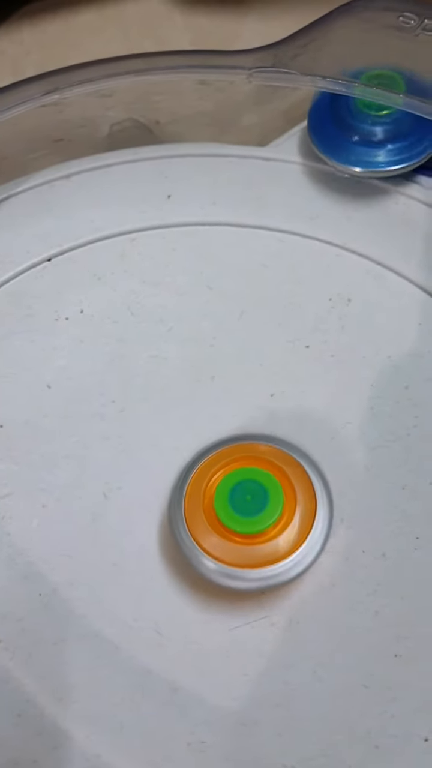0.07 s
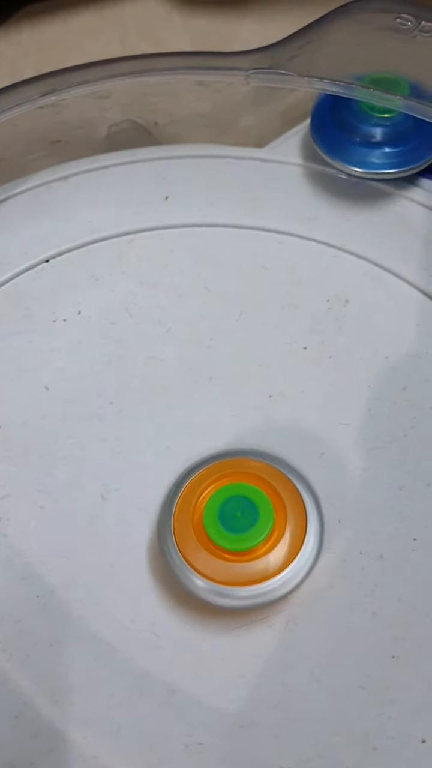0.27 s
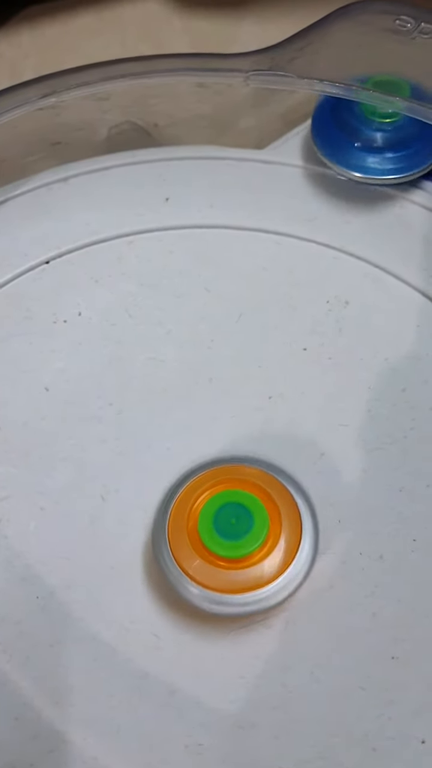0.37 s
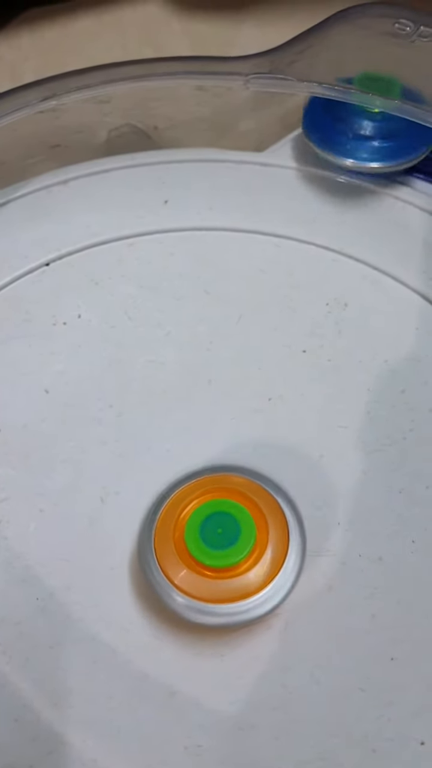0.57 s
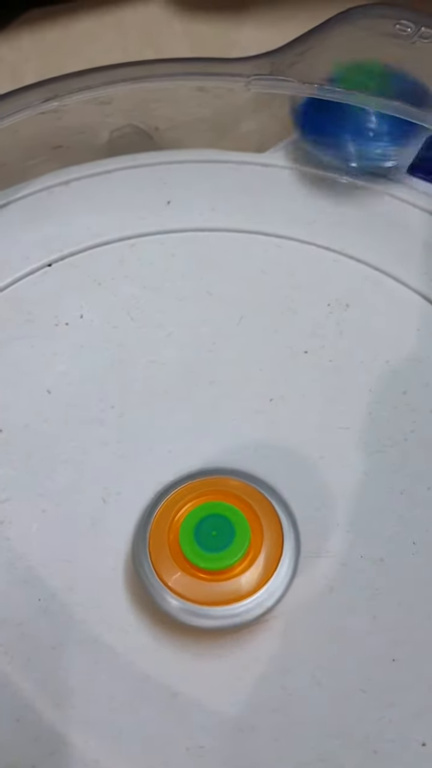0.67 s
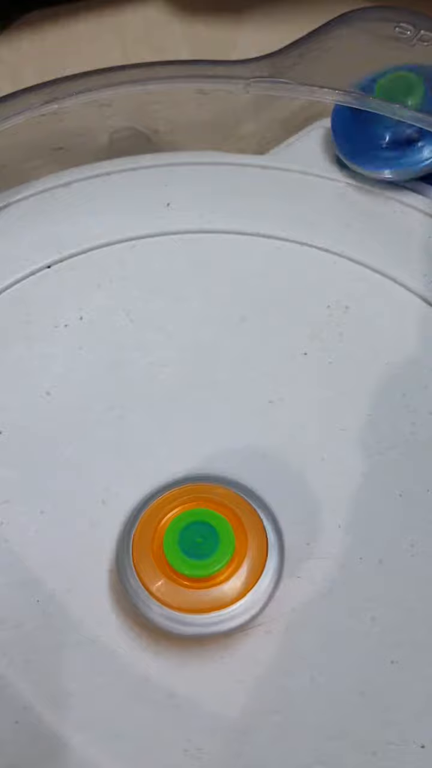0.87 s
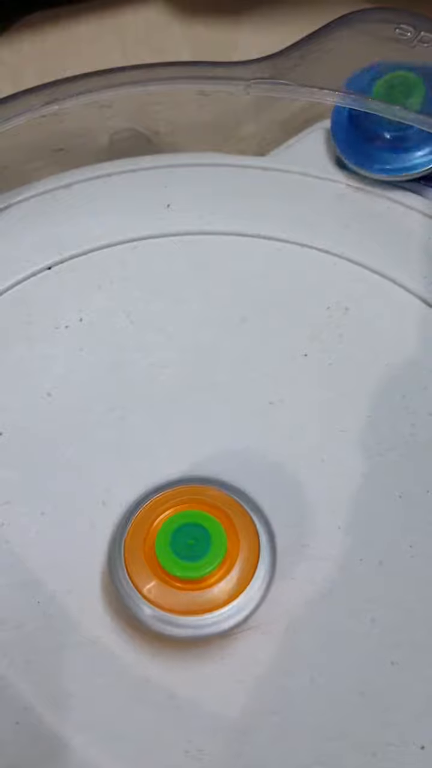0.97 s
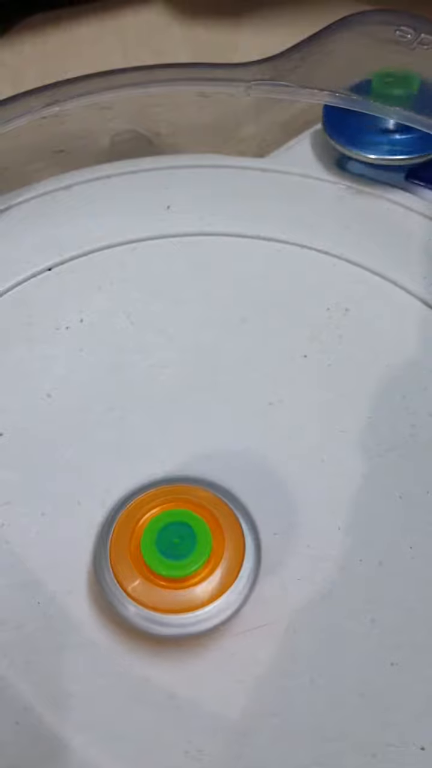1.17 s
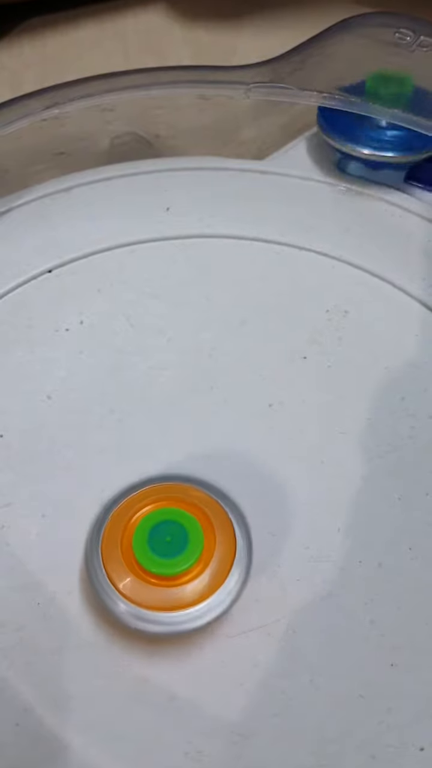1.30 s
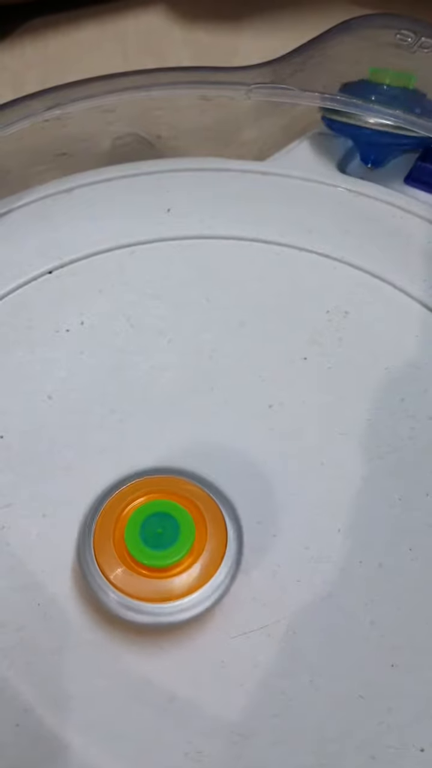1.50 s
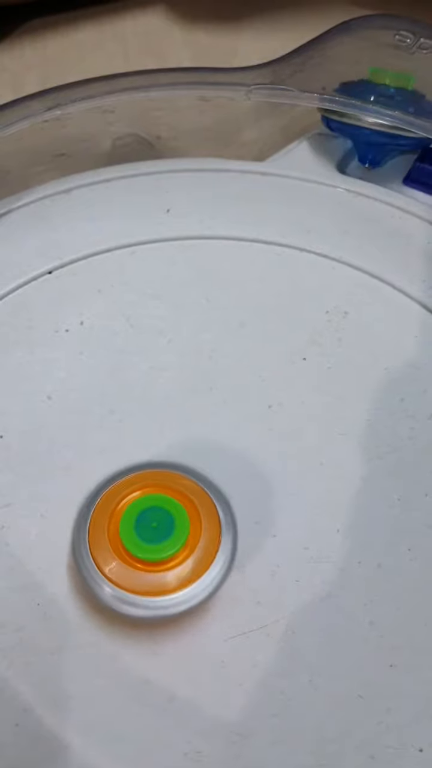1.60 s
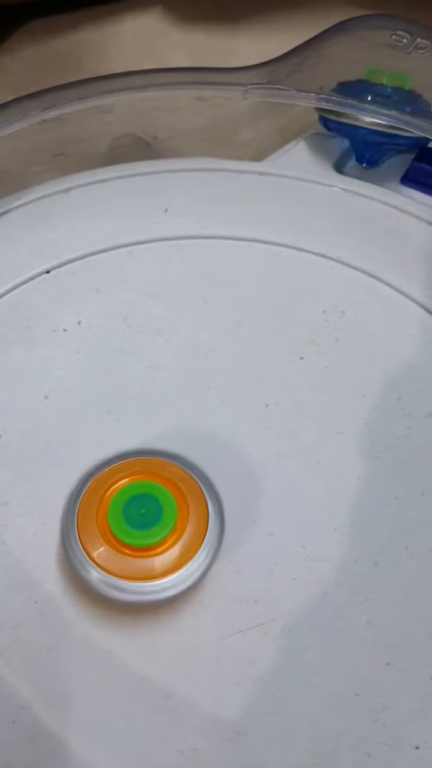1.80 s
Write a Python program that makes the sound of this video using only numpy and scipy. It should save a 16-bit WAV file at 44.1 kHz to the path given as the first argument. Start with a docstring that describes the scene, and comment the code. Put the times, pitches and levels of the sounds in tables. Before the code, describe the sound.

Hollow plastic clatter of a spinning top hitting an arena's rim, with faint humming underneath.

```python
"""In a small room, two plastic tops spin close by in a moulded plastic arena.
One skids into a pocket at the rim, where it knocks, rattles and scrapes against the thin walls
and makes them ring. Its metal ring pings on the rim, and its heavy landings boom in the floor.
Underneath, the off-balance spin hums through the arena floor, a tip grinds and ticks twice a turn,
and there is a low rumble."""
import sys
import numpy as np
from scipy import signal
from scipy.fft import rfft, irfft, next_fast_len
from scipy.io import wavfile
from scipy.ndimage import map_coordinates

SR = 44100
rng = np.random.default_rng(int(sys.argv[2]) if len(sys.argv) > 2 else 0)


def output_pcm(signal):
    """Save a mono or channel-first signal as 16-bit PCM at the path in sys.argv[1].

    Samples are clipped to [-1, 1] before scaling.
    """
    pcm = np.clip(np.atleast_2d(signal).T, -1, 1) * 32767
    wavfile.write(sys.argv[1], SR, np.round(pcm).astype(np.int16))


N = 81585

# The notes the arena's plastic shell rings with. Each row: pitch in Hz, level in dB.
SHELL_NOTES = [(555, -0.5), (612, -27), (655, 3), (882, 1), (974, 2), (1040, -1.5), (1264, 0.5)]
SHELL_CYCLES = 63.5  # swings until a note has died away


def wall_knocks():
    """Each knock shoves the wall, which rings with the hollow pocket; the top itself clacks and snaps."""
    # Each row: start in seconds, wall thud in dB, top's clack in dB, contact snap in dB, wall pitch in Hz.
    hits = [(.247, -12, -19.5, -31, 598), (.259, -18.5, -45, -31.5, 645), (0.306, -13.5, -25, -39.5, 563),
            (.311, -21, -24, -31, 556), (0.4216, -25, -23, -38, 565), (0.443, -18, -26.5, -31.5, 620),
            (.451, -17.5, -34, -48, 683), (.4755, -14.5, -23.5, -30, 540), (.479, -11.5, -14, -18, 633),
            (.537, -9, -16.5, -22.5, 588), (0.546, -13.5, -13.5, -20, 528), (.6035, -12, -14.5, -20.5, 499),
            (.622, -15, -24, -30, 493), (0.6652, -19, -42, -32.5, 625), (.692, -14.5, -47, -33.5, 564),
            (0.7059, -14.5, -18, -27, 598), (0.7195, -10.5, -15.5, -15.5, 651),
            (.731, -11, -20.5, -39, 480), (.768, -28, -21, -31, 666), (0.8018, -9, -21, -24, 630),
            (.83, -29, -11, -27, 910), (.855, -11, -15, -23, 1020), (.889, -16, -20.5, -26.5, 580),
            (.92, -35, -11, -25, 476), (.933, -22, -16, -26.5, 466), (.9717, -22, -19, -27, 673),
            (.9955, -10, -24, -31.5, 706), (1.0095, -14.5, -15, -31, 516), (1.0518, -5, -17, -26, 1108),
            (1.062, -17.5, -20.5, -26, 575), (1.094, -11.5, -21.5, -28, 586),
            (1.135, -15.5, -18, -30.5, 655), (1.225, -31.5, -36.5, -36, 540),
            (1.2723, -29, -32, -41.5, 1060), (1.3171, -16.5, -18, -30, 658), (1.35, -19.5, -29, -35, 595),
            (1.3607, -23.5, -34, -38, 493), (1.4109, -34, -23.5, -28, 540), (1.44, -13.5, -19, -28, 573),
            (1.457, -16, -19.5, -44, 480), (1.4645, -6, -36, -42, 662), (1.4967, -10.5, -24.5, -26, 460),
            (1.55, -23, -25, -50, 590)]
    # The tone of the top's body clacking. Each row: frequency in Hz, level in dB.
    clack_tone = [(300, -51), (500, -3.5), (1000, 8.5), (1700, 3.5), (2400, -7), (3000, -3.5),
                  (5000, -35.5)]
    # The tone of the hard contact snapping. Each row: frequency in Hz, level in dB.
    snap_tone = [(1200, -6), (3000, 3), (5200, 1), (6700, -7), (7800, -0.5), (10000, -6.5), (12500, -7),
                 (16000, -12.5)]
    pocket_hz, pocket_width_hz, hard_snap_db = 466.3, 67, -14
    out, t = np.zeros((2, N + SR)), np.arange(SR // 5) / SR
    for start, thud_db, clack_db, snap_db, wall_hz in hits:
        thud = amp(2) * np.cos(2 * np.pi * wall_hz * t) * fade(t, 31.8 / wall_hz)
        # The pocket rings most when the wall's pitch is near its own.
        pocket_gain = amp(-4) / np.hypot(1, (wall_hz - pocket_hz) / pocket_width_hz)
        pocket = pocket_gain * np.cos(2 * np.pi * pocket_hz * t) * fade(t, 0.11)
        shell = amp(-9.5) * ring(t, SHELL_NOTES, SHELL_CYCLES)
        # The wall gives off little sound below its lowest note.
        ringing = high_pass(thud + pocket + shell, hz=389, order=4)
        wall = amp(thud_db) * (amp(1) * shove(t, hz=733) + ringing)
        clack = amp(3.5 + clack_db) * noise(len(t), clack_tone) * fade(t, 0.053)
        tilt_db_per_octave = 0.14 * (snap_db - hard_snap_db)  # softer snaps are duller
        dulled = [(hz, db + tilt_db_per_octave * np.log2(hz / snap_tone[0][0])) for hz, db in snap_tone]
        snap = amp(4 + snap_db) * noise(len(t), dulled) * fade(t, 0.04, rise_s=0.00049)
        add(out, start, wall + clack + snap)
    return out[:, :N]


def metal_pings():
    """The top's metal ring strikes the rim and sounds a few high notes."""
    # Each row: start in seconds, level in dB.
    strikes = [(.4785, -10.5), (.546, -34), (.604, -17), (.72, -45)]
    # The metal's notes. Each row: pitch in Hz, level in dB.
    metal_notes = [(4670, -3), (4950, 2), (5250, -5), (7600, -6), (9550, -10)]
    out, t = np.zeros((2, N + SR)), np.arange(SR // 5) / SR
    for start, db in strikes:
        add(out, start, amp(db) * ring(t, metal_notes, cycles=82, apart_hz=9000))
    return out[:, :N]


def floor_landings():
    """The top lands heavily: the arena floor makes one slow swing and booms."""
    # Each row: start in seconds, level in dB.
    landings = [(.248, -16), (0.311, -17), (.33, -26), (0.448, -17), (.72, -16.5), (.802, -26.5),
                (0.86, -24), (.921, -14), (0.97, -19.5), (0.998, -18.5), (1.053, -21.5), (1.137, -24.5),
                (1.412, -28.5), (1.498, -21.5)]
    # The floor's low notes. Each row: pitch in Hz, level in dB.
    floor_notes = [(108, -9.5), (152, -8), (212, -2.5), (255, 0), (296, -7.5)]
    out, t = np.zeros((2, N + SR)), np.arange(SR // 5) / SR
    for start, db in landings:
        push = amp(4.5) * shove(t, hz=341)
        boom = amp(-5) * ring(t, floor_notes, cycles=33)
        add(out, start, amp(db) * (push + boom))
    return out[:, :N]


def wall_scrape(slips_per_s=3500, spread_db=3.5, treble_hz=3000):
    """The spinning edge catches the wall in many tiny slips, which keep the shell ringing."""
    # How hard the top rubs. Each row: time in seconds, level in dB.
    rub_levels = [(.24, -61), (.27, -34), (.40, -43.5), (.45, -27), (.52, -27.5), (.76, -22.5),
                  (.91, -26.5), (1.02, -19.5), (1.21, -39.5), (1.39, -28.5), (1.47, -17), (1.6, -36),
                  (1.65, -50)]
    # The tone of the rubbing. Each row: frequency in Hz, level in dB.
    rub_tone = [(90, -21), (370, -8.5), (480, 0), (1000, -8.5), (2100, -16.5), (5200, -23.5), (6600, -32),
                (7800, -26.5), (16000, -41)]
    level_db, = curves(rub_levels)
    slipping = rng.random(N) < slips_per_s / SR
    slips = slipping * amp(spread_db * np.clip(rng.standard_normal(N), -2, 2))
    friction = coloured(slips * rng.standard_normal((2, N)), rub_tone)
    kicks = slips[None] * rng.standard_normal(N)
    shell = ring(np.arange(SR // 5) / SR, SHELL_NOTES, SHELL_CYCLES)
    ringing = unit(signal.fftconvolve(kicks, shell, axes=1)[:, :N])
    rub = friction + amp(-8) * ringing
    low = filtered(rub, lambda hz: 1 / (1 + (hz / treble_hz) ** 4))
    treble_db = -3.5 + 0.6 * (level_db - level_db.max())  # gentler rubbing is duller
    return amp(level_db) * (low + amp(treble_db) * (rub - low))


def floor_hum(turns, waver_db=1.3):
    """An off-balance top shakes the floor at multiples of its spin rate, each wavering in level."""
    # Each row: multiple of the spin rate, level in dB.
    hum_notes = [(1, -38.5), (2, -51), (3, -47.5), (4, -47.5), (6, -47.5), (10, -50.5)]
    hum = np.zeros(N)
    for multiple, db in hum_notes:
        # Glide to a new random value every two turns.
        waver = map_coordinates(rng.standard_normal(128), [turns / 2], mode="nearest")
        hum += amp(db + waver_db * waver) * np.sin(2 * np.pi * (round(multiple) * turns + rng.random()))
    return hum


def tip_ticks(turns, spread_db=1.8):
    """The tip ticks twice a turn, less evenly as time goes on."""
    # Each row: place in the turn from 0 to 1, level in dB.
    ticks = [(.05, -30), (.44, -31)]
    # The notes the tip rings with. Each row: pitch in Hz, level in dB.
    tip_notes = [(1900, -6), (3150, 5), (3900, -3.5)]
    out, t = np.zeros((2, N + SR)), np.arange(SR // 20) / SR
    whole_turns = np.arange(int(turns[-1]) + 1)
    for place, db in ticks:
        for start in np.searchsorted(turns, whole_turns + place) / SR:
            late, size = rng.standard_normal(2)
            jitter_s = .0005 + .0004 * start
            add(out, start + late * jitter_s, amp(db + spread_db * size) * ring(t, tip_notes, cycles=21.6))
    return out[:, :N]


def spinning_whirr():
    """The slowly dropping spin drives the hum and the ticks, while the tip grinds on the floor."""
    # Each row: time in seconds, speed in turns per second.
    spin_speeds = [(0, 49.2), (1.85, 47.58)]
    # Each row: time in seconds, gain of the hum in dB, gain of the tip's sounds in dB.
    whirr_levels = [(0, 1.5, -2), (.47, 3.5, 0.5), (.53, -5.5, -5.5), (1.75, -3, -5.5)]
    # The tone of the grinding tip. Each row: frequency in Hz, level in dB.
    grind_tone = [(150, -30), (480, 4.5), (750, 3.5), (1400, 7.5), (2450, -2.5), (3200, -6.5),
                  (4500, -17.5), (16000, -33)]
    speed, = curves(spin_speeds)
    hum_db, tip_db = curves(whirr_levels)
    turns = np.cumsum(speed) / SR
    hum = floor_hum(turns)
    tip = tip_ticks(turns) + amp(-39) * noise(N, grind_tone)
    return amp(hum_db) * hum + amp(tip_db) * tip


def room_echo(x):
    """The small room answers a sound with a short, fading tail."""
    # Each row: frequency in Hz, seconds the echo takes to fall by 60 dB.
    echo_times = [(150, 0.69), (600, 0.25), (3000, 0.48), (14000, 0.3)]
    hiss = noise(SR // 2, [(20, 0), (20000, 0)])
    hz, t, bands = signal.stft(hiss, SR, nperseg=256)
    decay = np.exp(-np.log(1000) * t / along(echo_times, hz)[:, None])
    _, tail = signal.istft(bands * decay, SR, nperseg=256)
    return signal.fftconvolve(x, tail / np.linalg.norm(tail[0]), axes=1)[:, :N]


def low_rumble():
    """A quiet, steady rumble lies under everything."""
    # Each row: frequency in Hz, level in dB.
    rumble_tone = [(25, -14), (110, 1), (215, 4), (300, -7), (1000, -27), (4000, -107)]
    return amp(-40) * noise(N, rumble_tone)


def ring(t, notes, cycles, spread_db=0.5, apart_hz=2300):
    """An object struck at a new spot: higher notes die sooner and differ more between the ears."""
    out = np.zeros((2, len(t)))
    for hz, db in notes:
        size, left, right = rng.standard_normal(3)
        phase = rng.uniform(0, 2 * np.pi) + np.array([[left], [right]]) * hz / apart_hz
        out += amp(db + spread_db * size) * np.sin(2 * np.pi * hz * t + phase) * fade(t, cycles / hz)
    return out


def shove(t, hz):
    """One swing out and back."""
    swing = np.pi * (hz * t - 1)
    return (1 - 2 * swing ** 2) * np.exp(-swing ** 2)


def fade(t, decay_s, rise_s=0.00084):
    """A quick rise, then a fall of 60 dB every decay_s seconds."""
    return (1 - np.exp(-t / rise_s)) * np.exp(-np.log(1000) * t / decay_s)


def noise(samples, tone):
    """Stereo noise with the given tone."""
    return coloured(rng.standard_normal((2, samples)), tone)


def coloured(pair, tone):
    """Give two unrelated signals a tone and blend them to stereo, most alike in the bass."""
    # Each row: frequency in Hz, how alike left and right are (1 the same, 0 unrelated).
    likeness = [(280, 0.82), (600, 0.79), (1200, -0.0007), (2200, 0.35), (5000, 0.13)]

    def response(hz):
        angle = np.arccos(np.clip(along(likeness, hz), -1, 1)) / 2
        return amp(along(tone, hz)) * [np.cos(angle), np.sin(angle)]

    mid, side = filtered(pair, response)
    return unit(np.array([mid + side, mid - side]))


def filtered(x, response):
    """Multiply each frequency in x by response(hz)."""
    n = x.shape[-1]
    padded = next_fast_len(n + 4096)
    return irfft(rfft(x, padded) * response(np.fft.rfftfreq(padded, 1 / SR)), padded)[..., :n]


def high_pass(x, hz, order):
    """Turn down what lies below hz."""
    return signal.sosfilt(signal.butter(order, hz, "highpass", fs=SR, output="sos"), x)


def along(points, hz):
    """Read between (Hz, value) points, with octaves evenly spaced."""
    frequencies, values = np.transpose(points)
    return np.interp(np.log(hz + 1), np.log(frequencies + 1), values)


def curves(rows):
    """One value per sample for each column after the time."""
    times, *columns = np.transpose(rows)
    return [np.interp(np.arange(N) / SR, times, column) for column in columns]


def amp(db):
    """Turn decibels into a gain."""
    return 10 ** (np.asarray(db) / 20)


def unit(x):
    """Scale to an average power of 1."""
    return x / np.sqrt(np.mean(x ** 2) + 1e-20)


def add(out, start, sound):
    """Mix a sound in at start seconds."""
    out[:, max(round(start * SR), 0):][:, :sound.shape[-1]] += sound


def scene():
    """The clatter and its echo come from the left, over the whirr and the rumble."""
    # Each row: frequency in Hz, left level minus right level in dB.
    balance = [(200, -2), (450, 6.5), (740, 2), (1220, 0.5), (3330, -1), (5200, 5.5), (9000, 1.5)]
    sides, left_lead_s = np.array([[.5], [-.5]]), 0.00017

    def from_left(hz):
        return amp(sides * along(balance, hz)) * np.exp(2j * np.pi * hz * sides * left_lead_s)

    clatter = wall_knocks() + metal_pings() + floor_landings() + wall_scrape()
    clatter = high_pass(clatter, hz=62, order=2)  # the clatter carries no deep bass
    in_room = clatter + amp(-8.5) * room_echo(clatter)
    return filtered(in_room, from_left) + spinning_whirr() + low_rumble()


def record(dry):
    """Clip any peaks beyond full scale and cut the very highest treble."""
    top_hz = 15900
    return signal.sosfilt(signal.ellip(10, .1, 80, top_hz, fs=SR, output="sos"), np.clip(dry, -1, 1))


dry = scene()
out = record(dry)
output_pcm(out)
```